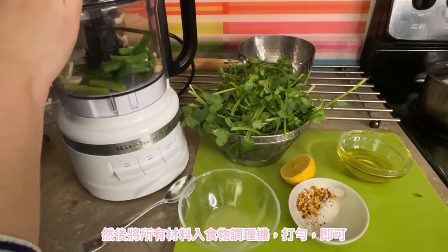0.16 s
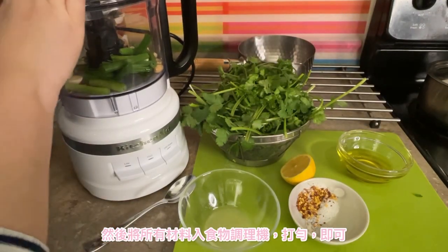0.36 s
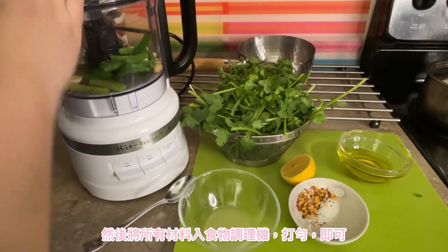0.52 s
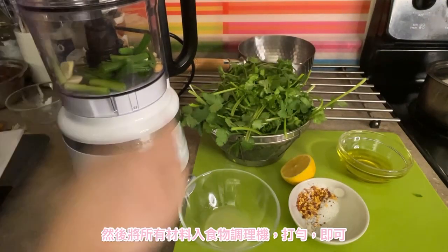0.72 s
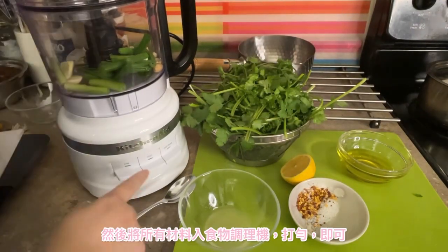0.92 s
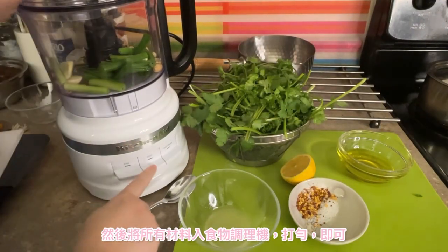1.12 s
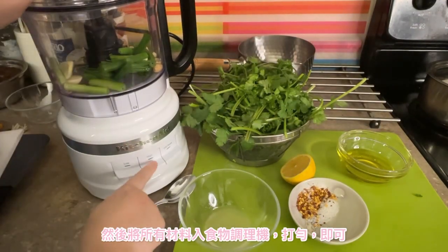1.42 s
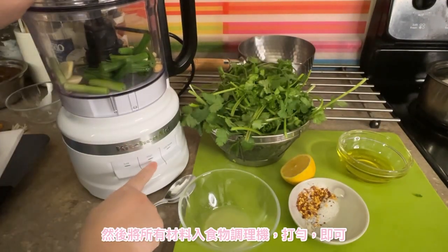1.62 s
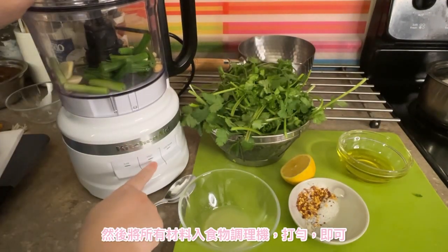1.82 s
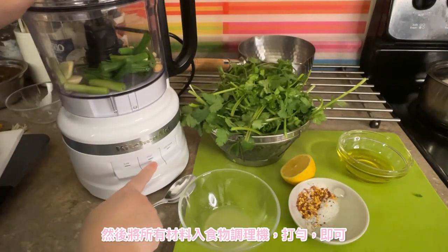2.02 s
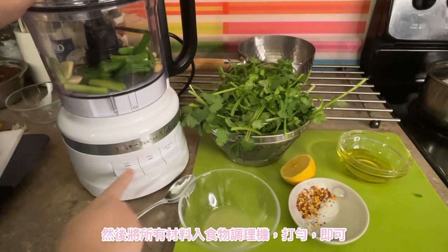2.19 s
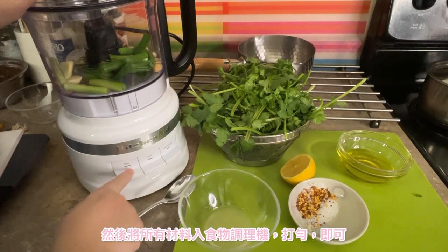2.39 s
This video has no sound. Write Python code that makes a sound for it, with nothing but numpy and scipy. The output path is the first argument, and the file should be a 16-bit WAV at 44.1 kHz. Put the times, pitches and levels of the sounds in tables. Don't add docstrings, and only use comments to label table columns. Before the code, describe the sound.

Hard plastic double clack as a food processor lid snaps shut, then faint handling and quiet.

```python
import sys
import numpy as np
from scipy import signal
from scipy.io import wavfile

SR = 44100
rng = np.random.default_rng(int(sys.argv[2]) if len(sys.argv) > 2 else 0)


def volts(x):
    e = np.asarray(x, float) / 20
    return 10 ** e


def dump(signal):
    limited = np.clip(np.atleast_2d(signal).T, -1, 1)
    pcm = np.round(limited * 32767).astype(np.int16)
    wavfile.write(sys.argv[1], SR, pcm)


N = 112454
PAD = int(.2 * SR)
LEFT_RIGHT = np.array([[1], [-1]])


def rms_one(x):
    return x / np.sqrt(np.mean(x ** 2) + 1e-20)


def at_hz(points, hz):
    table_hz, value = np.transpose(points)
    return np.interp(np.log(hz), np.log(table_hz), value)


def ring(x, hz, t60_s):
    r = volts(-60 / (t60_s * SR))
    w = 2 * np.pi * hz / SR
    return signal.lfilter([0, np.sin(w)], [1, -2 * r * np.cos(w), r * r], x + 1e-18)


def band(x, low_hz, high_hz):
    edges_hz = [max(low_hz, 10), min(high_hz, .45 * SR)]
    return signal.sosfilt(signal.butter(2, edges_hz, "band", fs=SR, output="sos"), x)


def bands(length, likeness):
    edges_hz = 45 * 2 ** np.arange(0, 8.6, .5)
    white = rng.standard_normal((2, 2, length))
    for k, (low_hz, high_hz) in enumerate(zip(edges_hz, edges_hz[1:])):
        hz = np.sqrt(low_hz * high_hz)
        mid, side = band(white[k % 2], low_hz, high_hz)
        alike = np.clip(at_hz(likeness, hz), -1, 1)
        yield hz, np.sqrt(1 + alike) * mid + np.sqrt(1 - alike) * side * LEFT_RIGHT


# pitch_hz, level_db [rms], width_hz
HUM = [(29, -65.5, 1.5), (60.5, -68, 1.6), (75.4, -64.5, 9), (182.5, -80.5, 7.3)]
# freq_hz, density_db [per Hz]
AIR = [(100, -3), (200, -4), (500, -12), (1000, -19), (3000, -25), (5500, -23), (9000, -23), (12000, -20)]
# freq_hz, likeness [left-right, -1..1]
AIR_LIKENESS = [(60, .95), (130, .91), (500, .9), (2500, .3), (9000, 0), (11000, .85)]
AIR_DB = -73.5


def background():
    air = 0
    for hz, noise in bands(N + PAD, AIR_LIKENESS):
        if hz > 90:
            air = air + volts(at_hz(AIR, hz)) * noise
    hum = 0
    for hz, level_db, width_hz in HUM:
        white = rng.standard_normal((2, N + SR))
        mid, side = ring(white, hz, 2.4 / width_hz)[:, SR:]
        hum = hum + volts(level_db) * rms_one(mid + .2 * side * LEFT_RIGHT)
    return volts(AIR_DB) * rms_one(air[:, PAD:]) + hum


# start_s, peak_db, bright_db
CLACKS = [(-.09, -32, 2.5), (.183, -37.5, -16), (0.1915, -41.5, -10), (0.194, -34.5, -7), (0.199, -31, 2),
          (0.202, -15, 3), (.2036, -14, 3), (.2065, -15.5, -10), (0.207, -17.5, -9.5), (0.2125, -11.5, 2),
          (.2138, -8.5, 2), (0.2152, -7, 3.5), (0.218, -6.5, -3), (0.2209, -11.5, -2), (0.2271, -20, -4),
          (.233, -24, -2), (0.2449, -24, -2), (0.331, -53.5, 14.5), (0.476, -43, 3.5), (0.659, -51, 3),
          (.943, -46.5, -1.5), (1.029, -37.5, -10)]
# pitch_hz, level_db
LID_BOWL = [(105, -6.5), (360, -17.5), (474, -5.5), (720, -4.5), (926, -2), (1100, -2), (1400, -2), (1825, -8.5),
            (2514, -6.5), (3000, -5), (3790, -5), (4150, -4), (4850, -2), (5500, -3),
            (410, -16.5), (620, -6.5), (1010, -3.5), (1250, -3.5), (1600, -12), (2150, -10), (3400, -8),
        (4500, -5.5), (6300, -10), (7400, -16), (9200, -17), (11900, -8)]
TOUCHES, TOUCH_GAP_S, TOUCH_FADE_DB = 5, .0012, 2.0
LID_T60_S, LID_DAMPING = .014, .44
CRACK_DB, CRACK_S, CRACK_TOP_HZ = -17, .00074, 6500


def lid():
    start_s, peak_db, bright_db = np.transpose(CLACKS)[..., None]
    shape = (len(CLACKS), TOUCHES)
    gaps = np.abs(rng.standard_normal(shape))
    steps = np.cumsum(gaps, axis=1) - gaps[:, :1]
    at = (PAD + (start_s + TOUCH_GAP_S * steps) * SR).astype(int)
    touch_db = peak_db - TOUCH_FADE_DB * np.arange(TOUCHES)

    rings = np.zeros(N + PAD)
    for hz, level_db in LID_BOWL:
        octaves_up = max(np.log2(hz / 400), 0)
        spread_db = 1.0 * rng.standard_normal(shape)
        mode_db = level_db - 8.0 + bright_db * octaves_up / 2 + spread_db
        clicks = np.zeros(N + PAD)
        np.add.at(clicks, at, rng.choice([-1, 1], shape) * volts(touch_db + mode_db))
        rings += ring(clicks, hz, LID_T60_S * (hz / 1000) ** -LID_DAMPING)

    kick = np.zeros(N + PAD)
    np.add.at(kick, at, volts(touch_db + CRACK_DB + 1.8 * bright_db))
    puff = signal.lfilter([1], [1, -np.exp(-1 / (CRACK_S * SR))], kick + 1e-18)
    hiss = rms_one(band(rng.standard_normal(N + PAD), 700, CRACK_TOP_HZ))
    return band(rings + puff * hiss, 80, 11000)


# start_s, hold_s
BRUSH_TIMES = [(-.02, .14), (.178, .005), (.465, .10), (.51, .07), (.66, .08), (.695, .02), (.62, .45),
               (.925, .02), (1.03, .07), (1.045, .06), (1.30, .03), (1.515, .05), (2.05, .12), (2.15, .05),
               (2.14, .04), (2.47, .08), (.44, .02)]
# level_db, centre_hz, reach_octaves [each way]
BRUSHES = [(-71.5, 700, 0.35), (-51.5, 1200, 1.5), (-60, 2000, 3.3), (-65, 11540, 0.11), (-63.5, 360, 1.57),
           (-60.5, 2240, 1.27), (-78, 1500, 3.31), (-71, 790, 1.47), (-66.5, 660, 1.45), (-75, 3370, 1.36),
           (-83, 1800, 1.2), (-80, 6040, 0.4), (-71.5, 1900, 2.63), (-84, 12000, 1.2), (-72.5, 480, 0.46),
           (-79.5, 11000, 0.3), (-56.5, 870, 1.43)]
BRUSH_GRAIN_DB, BRUSH_ATTACK_S, BRUSH_T60_S = 1.5, .025, .24


def brushes():
    t = np.arange(N) / SR
    white = rng.standard_normal((2, N))
    grain = volts(BRUSH_GRAIN_DB * rms_one(band(rng.standard_normal(N), 5.5, 100)))
    out = 0
    for (start_s, hold_s), (level_db, hz, octaves) in zip(BRUSH_TIMES, BRUSHES):
        rise = np.clip((t - start_s) / BRUSH_ATTACK_S, 0, 1)
        after_s = np.maximum(t - start_s - BRUSH_ATTACK_S - hold_s, 0)
        swell = rise * volts(-60 * after_s / BRUSH_T60_S)
        rub = rms_one(band(white, hz * 2 ** -octaves, hz * 2 ** octaves))
        out = out + volts(level_db) * swell * rub
    return out * grain


# start_s, peak_db, low_mode_db, high_mode_db [re middle mode]
THUDS = [(-.002, -39.5, -40, -11.5), (0.051, -43.5, -30, -33), (.101, -42, -21, -16.5),
         (0.217, -34.5, 7.5, 6), (0.243, -33, -9, -12), (0.292, -43, -23, -23), (0.328, -46.5, -19, -13),
         (0.388, -56, 8, -9), (.481, -49, 15, 14.5), (.494, -38, 4.5, -24), (0.559, -43.5, 2.5, -7),
         (0.623, -56, 11, -14), (0.731, -55.5, -5, -1), (.949, -45.5, -8.5, 2), (.972, -46.5, 1, -18),
         (1.01, -54, 9, -1), (1.408, -63, 15, -15), (1.508, -61, 8, -4.5), (2.058, -66.5, 3, 11.5),
         (2.064, -62.5, 6, 13.5), (2.09, -58, 7, 1)]
# pitch_hz, t60_s
COUNTER = [(82, 0.037), (165, 0.11), (320, 0.047)]
THUD_SOFT_HZ = 454


def thuds():
    start_s, peak_db, low_db, high_db = np.transpose(THUDS)
    soft = signal.butter(2, THUD_SOFT_HZ, fs=SR, output="sos")
    out = 0
    for (hz, t60_s), share_db in zip(COUNTER, (low_db, 0, high_db)):
        clicks = np.zeros(N + PAD)
        clicks[PAD + (start_s * SR).astype(int)] = volts(peak_db + share_db)
        pushes = signal.sosfilt(soft, clicks + 1e-18)
        out = out + ring(pushes, hz, t60_s)
    return band(out, 55, 2000)


# start_s, level_db, pitch_hz, hold_s
TINKLES = [(1.22, -80.5, 6644, 0.059), (1.226, -82.5, 7980, 0.028), (1.28, -76.5, 4780, 0.071),
           (1.508, -82, 6200, 0.072), (1.547, -80, 4800, 0.073), (1.854, -79.5, 4900, 0.054),
           (2.058, -76.5, 6275, .08), (2.07, -74.5, 3240, 0.027), (2.079, -72.5, 5020, 0.041),
           (2.108, -74.5, 4820, 0.037), (2.144, -72.5, 816, 0.036), (2.155, -75.5, 7760, 0.051),
           (2.158, -71, 10900, 0.028), (2.167, -71.5, 6140, 0.036), (2.162, -75.5, 4670, 0.039),
           (2.156, -77, 1380, 0.031), (2.209, -77.5, 1400, 0.0076), (2.071, -80, 11300, .07),
           (2.1, -87, 9140, 0.09), (2.422, -80.5, 4740, 0.017), (2.485, -80, 7880, .06),
           (2.43, -83.5, 5980, 0.054), (0, -78, 4220, 0.092), (1.05, -75, 4760, .04)]
TINKLE_WIDTH_HZ, TINKLE_RISE_S, TINKLE_T60_S, TINKLE_FLUTTER_DB = 480, .015, .1, 3.5


def tinkles():
    t = np.arange(N) / SR
    white = rng.standard_normal((2, N))
    flutter = rms_one(band(rng.standard_normal((len(TINKLES), N)), 15, 90))
    out = 0
    for (start_s, level_db, hz, hold_s), shake in zip(TINKLES, flutter):
        shimmer = rms_one(band(white, hz - TINKLE_WIDTH_HZ / 2, hz + TINKLE_WIDTH_HZ / 2))
        rise = np.clip((t - start_s) / TINKLE_RISE_S, 0, 1)
        after_s = np.maximum(t - start_s - TINKLE_RISE_S - hold_s, 0)
        decay_db = -60 * after_s / TINKLE_T60_S
        out = out + volts(level_db + TINKLE_FLUTTER_DB * shake + decay_db) * rise * shimmer
    return out


# freq_hz, t60_s
ROOM_T60 = [(100, 0.63), (500, 0.26), (1200, 0.42), (4000, 0.38), (7000, .3), (12000, 0.26)]
# freq_hz, level_db
ROOM_COLOUR = [(100, -7), (500, -5), (1200, -1), (2000, -0.5), (4200, 0), (7000, -4), (12000, -10.5)]
# freq_hz, likeness [left-right, -1..1]
ROOM_LIKENESS = [(100, -0.54), (300, .8), (600, 1), (1200, -0.13), (4000, -0.3), (12000, .3)]
ROOM_DB, ROOM_RISE_S, ROOM_LEFT_DB = -12, .0013, 2.5


def kitchen(x):
    t = np.arange(int(.7 * SR)) / SR
    tail = 0
    for hz, noise in bands(len(t), ROOM_LIKENESS):
        tail = tail + volts(at_hz(ROOM_COLOUR, hz) - 60 * t / at_hz(ROOM_T60, hz)) * noise
    tail = tail * (1 - np.exp(-t / ROOM_RISE_S))
    tail = tail / np.sqrt(np.sum(tail ** 2) / 2)
    wet = signal.fftconvolve(x[None], tail, axes=1)[:, :len(x)]
    return volts(ROOM_DB + ROOM_LEFT_DB * LEFT_RIGHT) * wet


RIGHT_LAG_S, RIGHT_DB, RIGHT_CUT_HZ = .00047, -3.5, 3000
RIGHT_TOP_HZ, RIGHT_TOP_DB = 8076, -1.5
THUD_LEFT_DB, HAND_LEFT_DB = 1.5, 1.3


def scene():
    clack, thud = lid(), thuds()
    n = np.arange(N + PAD)
    late = np.interp(n - RIGHT_LAG_S * SR, n, clack)
    dull = signal.lfilter(*signal.butter(1, RIGHT_CUT_HZ, fs=SR), late)
    top = band(clack, RIGHT_TOP_HZ, 15000)
    right = volts(RIGHT_DB) * dull + volts(RIGHT_TOP_DB) * top
    near = np.array([clack, right]) + thud * volts(THUD_LEFT_DB * LEFT_RIGHT)
    machine = (near + kitchen(clack + .34 * thud))[:, PAD:]
    return machine + volts(HAND_LEFT_DB * LEFT_RIGHT) * (brushes() + tinkles() + background())


def low_pass(x):
    return signal.sosfilt(signal.butter(12, 12620, fs=SR, output="sos"), x)


def record(dry):
    ceiling = 1.1
    rounded = ceiling * np.tanh(dry / ceiling)
    top_cut = signal.cheby2(10, 60, 13000, fs=SR, output="sos")
    gap = signal.cheby2(3, 16, [9750, 10550], "bandstop", fs=SR, output="sos")
    mix = signal.sosfilt(gap, signal.sosfilt(top_cut, rounded))
    return low_pass(mix)


dry = scene()
out = record(dry)
dump(out)
```